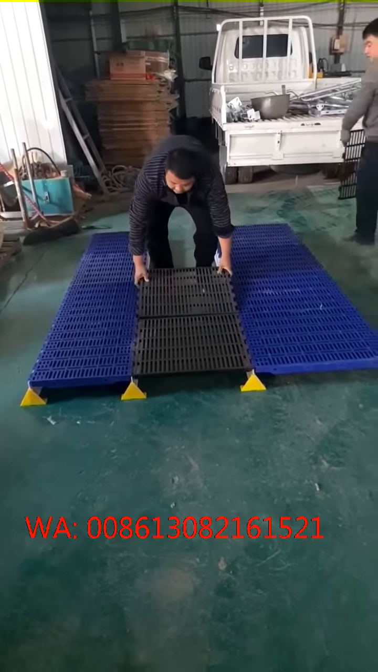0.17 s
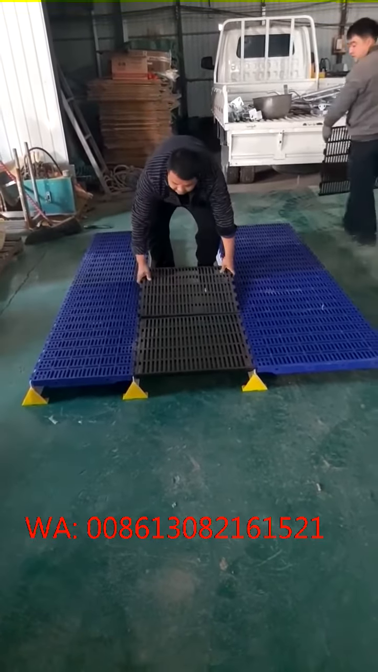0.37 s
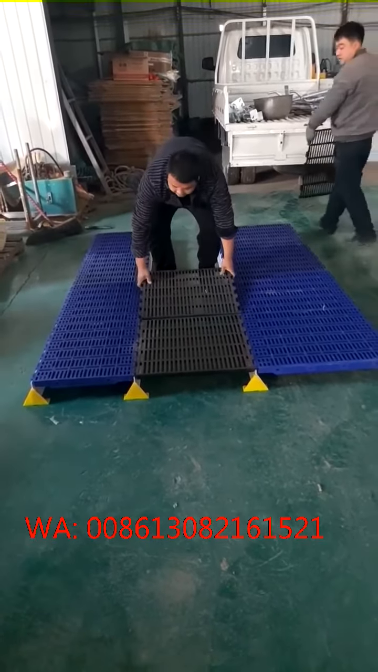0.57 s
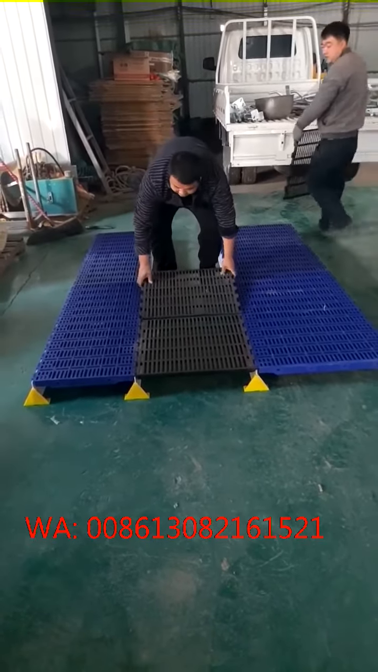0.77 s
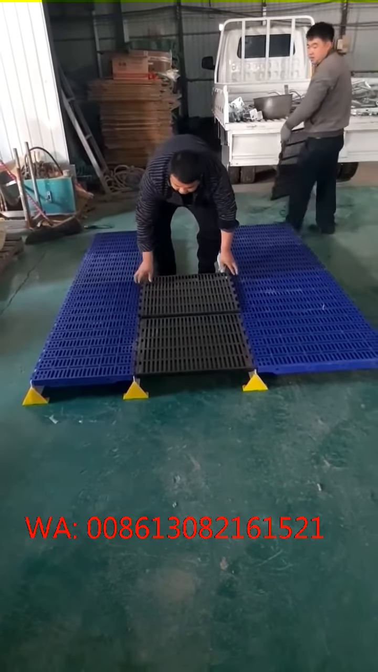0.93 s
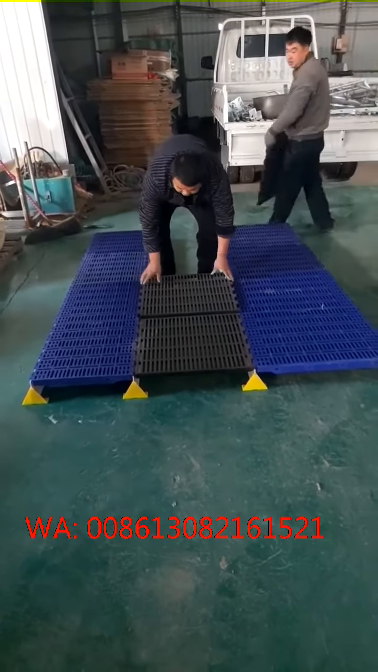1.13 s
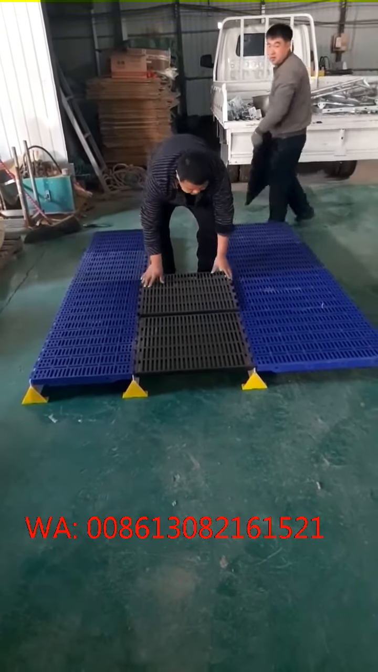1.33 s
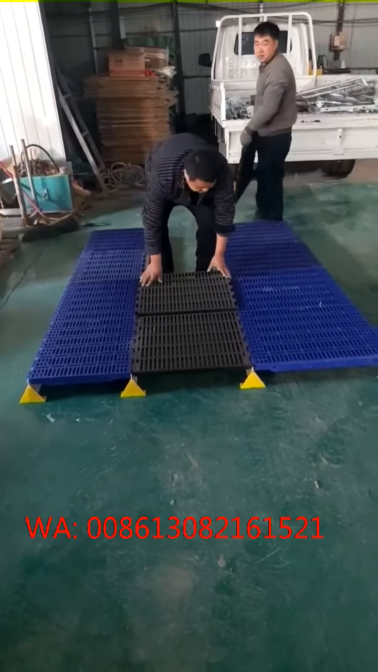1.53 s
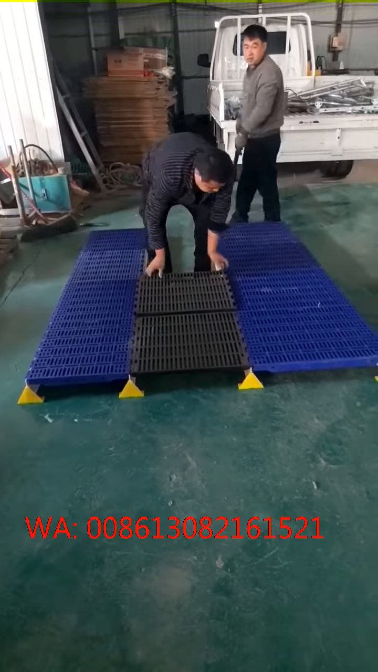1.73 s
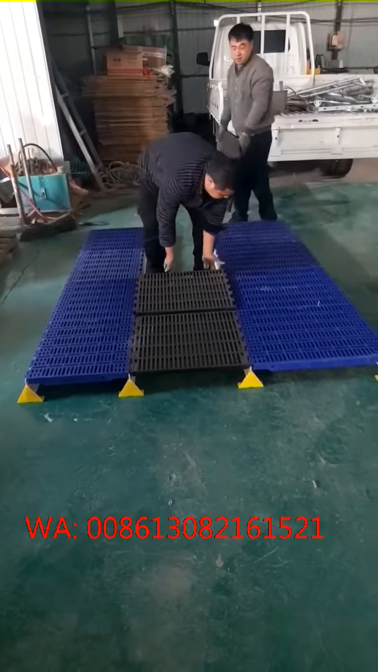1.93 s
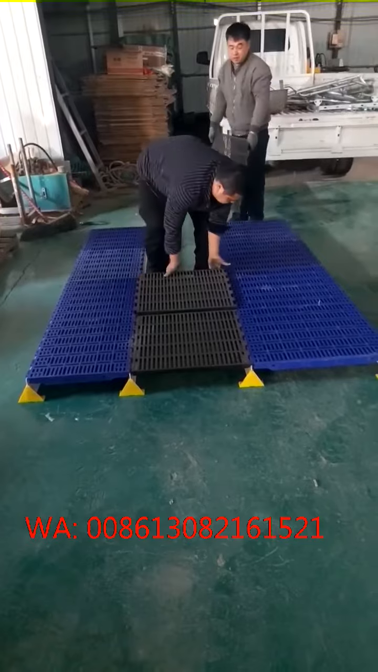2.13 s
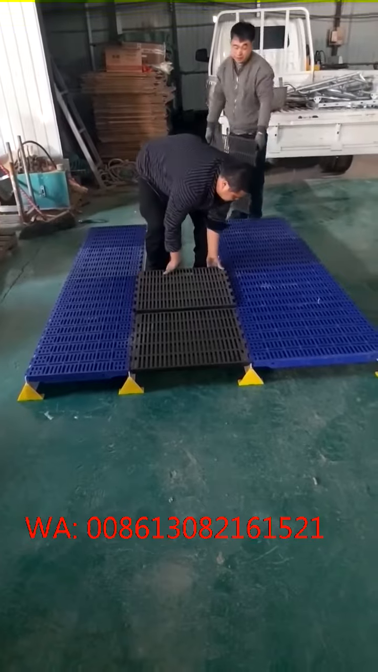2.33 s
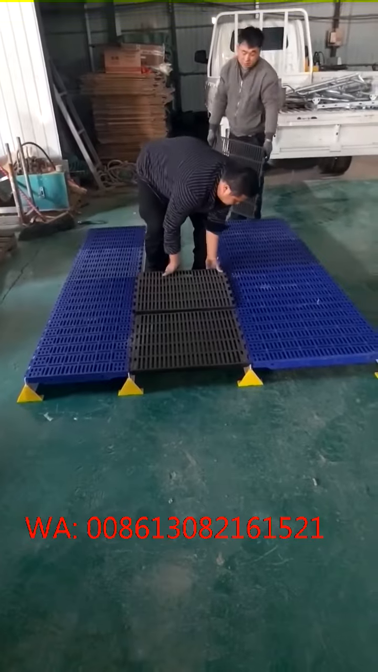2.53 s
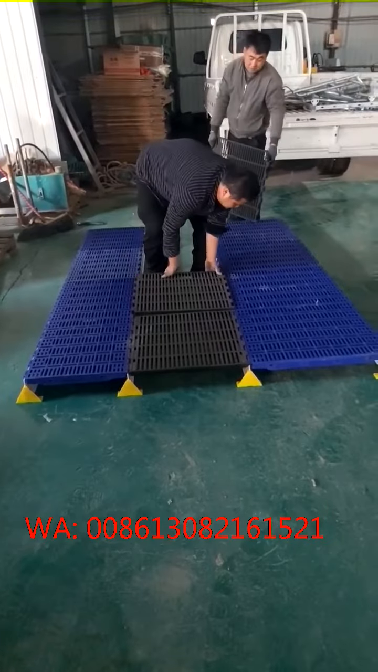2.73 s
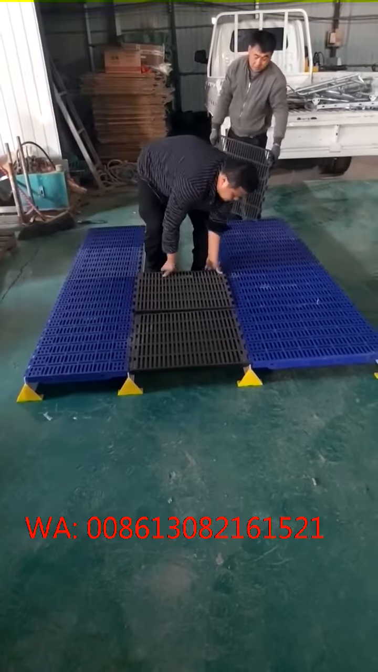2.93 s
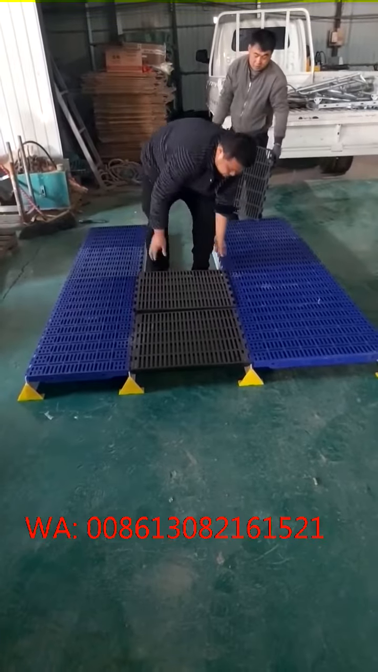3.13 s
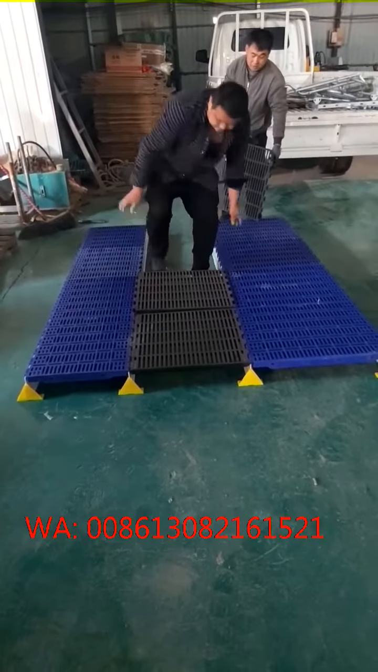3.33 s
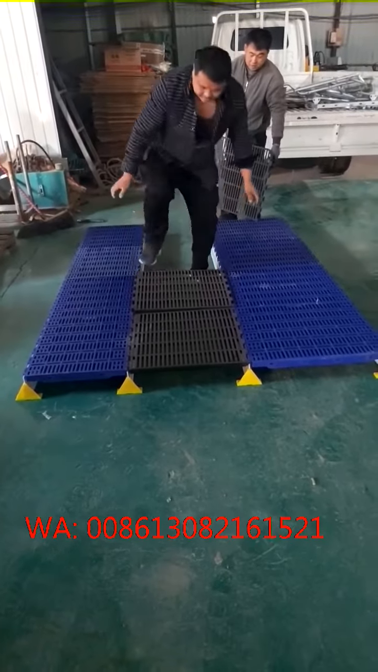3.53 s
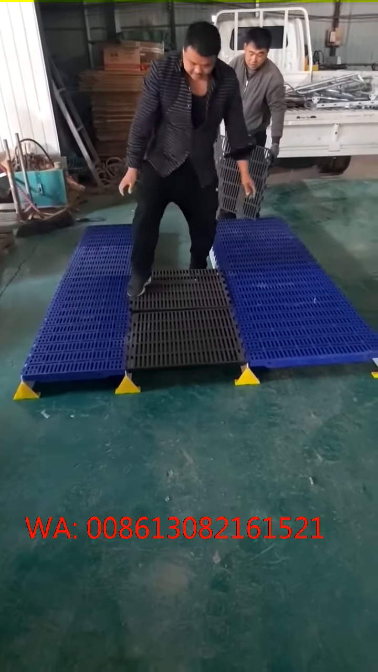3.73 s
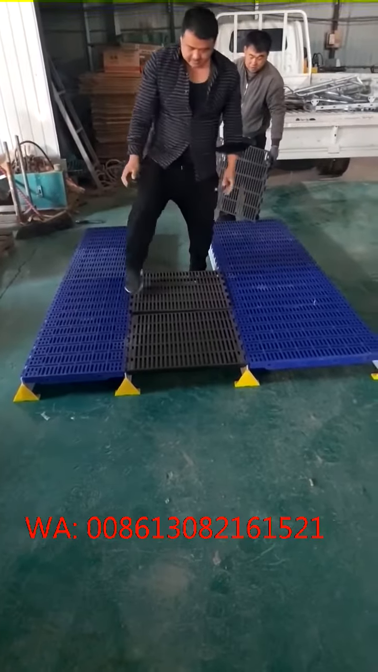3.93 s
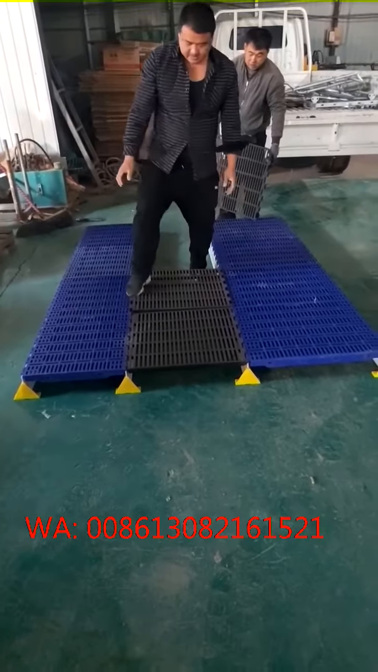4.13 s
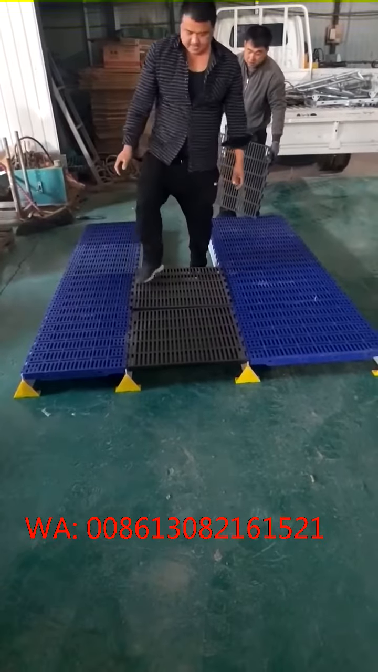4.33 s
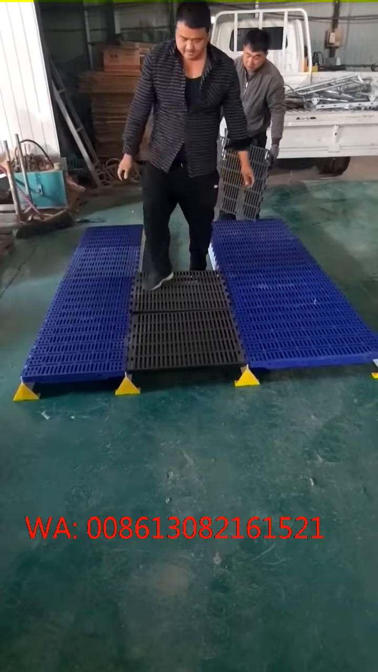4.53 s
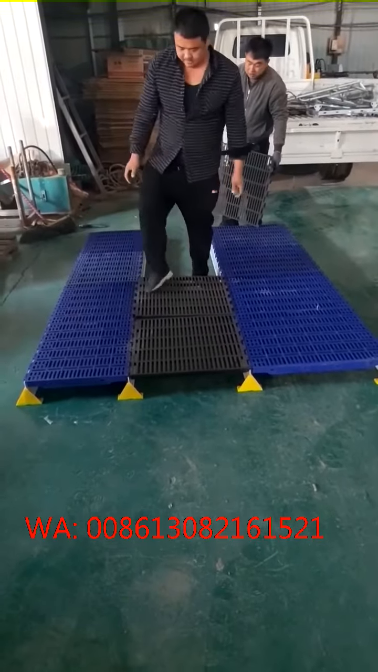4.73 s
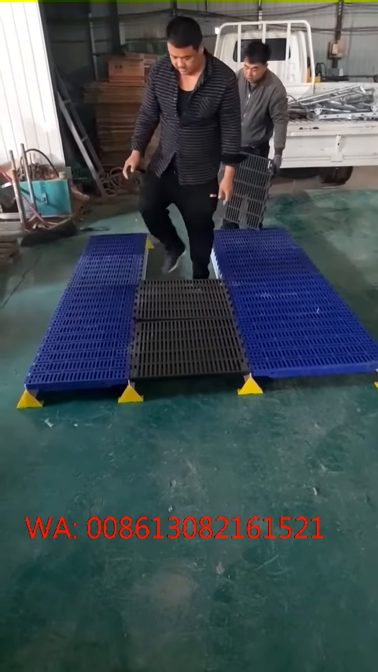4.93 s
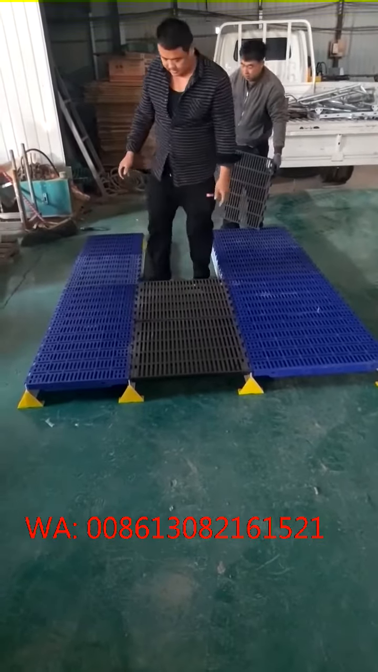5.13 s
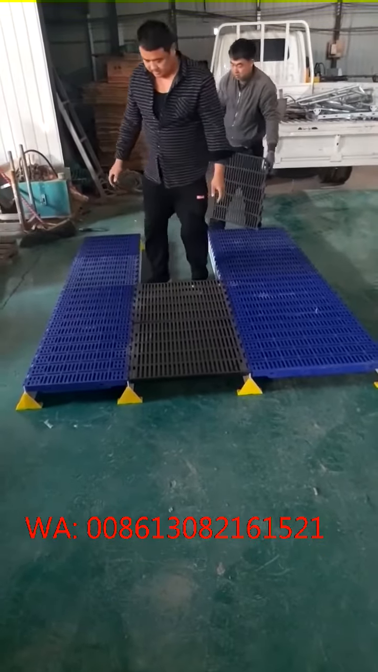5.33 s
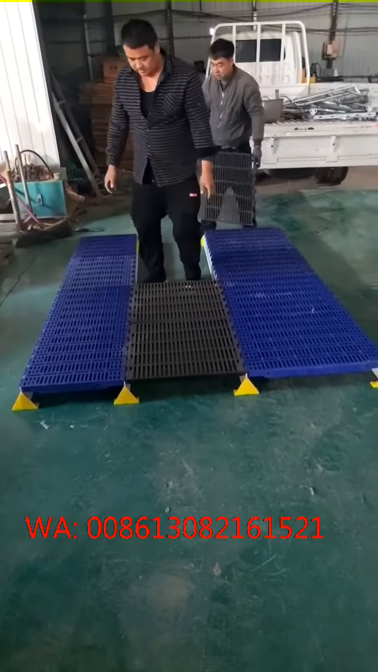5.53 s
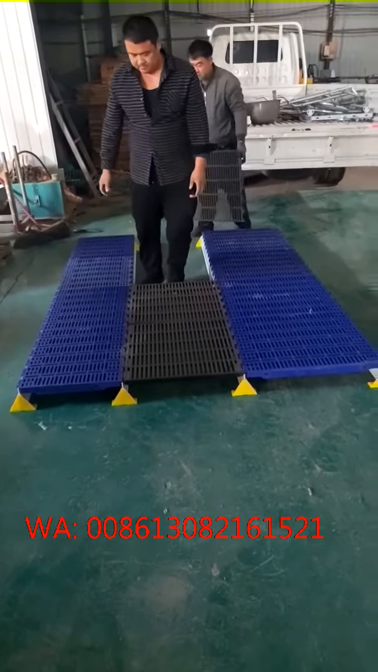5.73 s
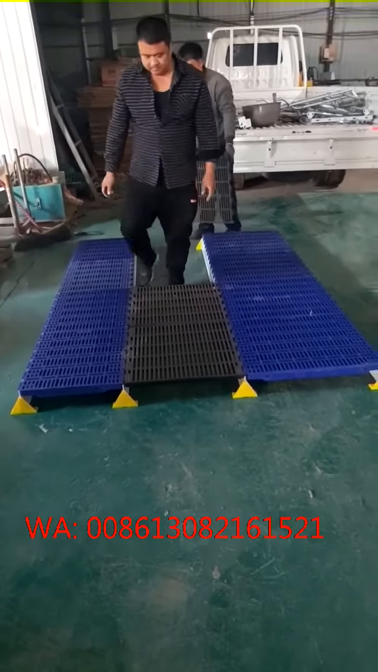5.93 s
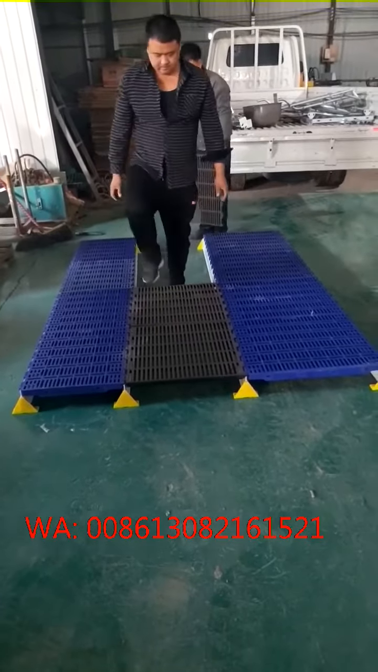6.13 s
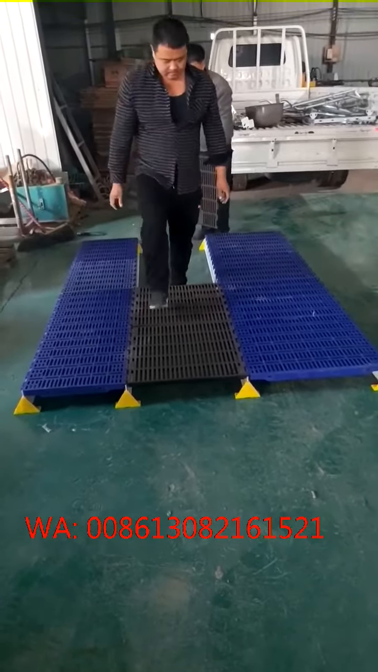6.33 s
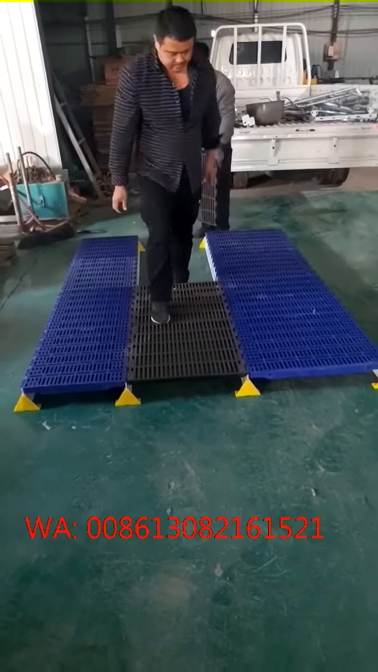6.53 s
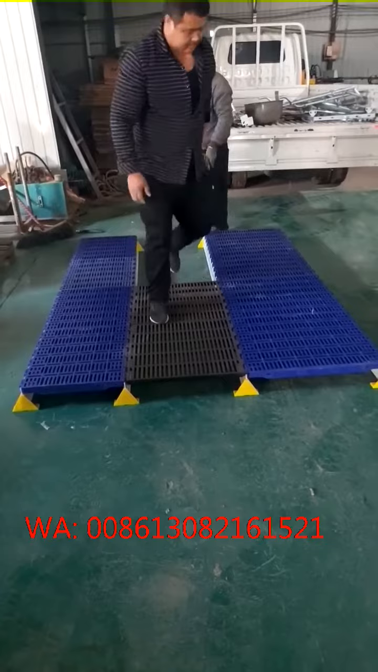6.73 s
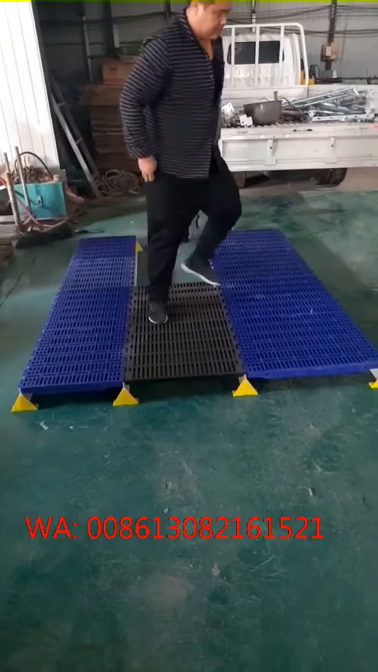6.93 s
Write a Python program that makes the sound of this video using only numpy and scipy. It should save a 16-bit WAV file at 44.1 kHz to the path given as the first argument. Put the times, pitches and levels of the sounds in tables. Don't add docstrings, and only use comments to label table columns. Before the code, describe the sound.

Quiet scuffs and dragging, a plastic panel dropped with a clattering knock, then several booming foot stamps with snapping clips echoing in a hall.

```python
import sys
import numpy as np
from scipy import signal
from scipy.io import wavfile

SR = 44100
rng = np.random.default_rng(int(sys.argv[2]) if len(sys.argv) > 2 else 0)


def field_ratio(decibels):
    return 10 ** (np.asarray(decibels, dtype=float) / 20)


def to_wav(s):
    ch = np.atleast_2d(s).T
    pcm = np.round(np.clip(ch, -1, 1) * 32767)
    wavfile.write(sys.argv[1], SR, pcm.astype(np.int16))


N = 307267
SPOTS = 15


def rms_one(x):
    return x / np.sqrt(np.mean(x ** 2) + 1e-20)


def at_hz(points, hz):
    points = np.array(points)
    return np.interp(np.log(hz), np.log(points[:, 0]), points[:, 1])


def add(track, at, sound):
    i = round(at * SR)
    track[i:i + len(sound)] += sound


def third_octaves(white):
    edges = 22 * 2 ** (np.arange(29) / 3)
    for k, (low, high) in enumerate(zip(edges, edges[1:])):
        band_filter = signal.butter(2, [low, high], "band", fs=SR, output="sos")
        yield np.sqrt(low * high), signal.sosfilt(band_filter, white[k % 2])


def resonate(x, modes):
    out = 0
    for k, (hz, width_hz, level_db) in enumerate(modes):
        r = np.exp(-np.pi * width_hz / SR)
        b = np.array([1, 0, -1]) * (1 - r * r) / 2
        a = [1, -2 * r * np.cos(2 * np.pi * hz / SR), r * r]
        out = out + (-1) ** k * field_ratio(level_db) * signal.lfilter(b, a, x + 1e-18)
    return out


def drift(rate_hz):
    r = np.exp(-80 * np.pi * rate_hz / SR)
    noise = rng.standard_normal(N // 40 + 2002)
    slow = signal.lfilter([1], [1, -2 * r, r * r], noise)[2000:]
    return np.interp(np.arange(N) / 40, np.arange(len(slow)), rms_one(slow))


def bustle():
    # time in #
    # seconds, level in dB.
    rumble_curve = [
        (0.0, -62),
        (0.99, -53),
        (1.45, -62),
        (2.48, -58),
        (3.18, -66),
        (3.59, -65.5),
        (6.96, -64.5),
    ]
    # level in dB of dragging, whine and hiss.
    idle_db = [-64.5, -63, -68.5]
    # start in seconds, length in seconds, whine in dB, weight in dB, grit in dB.
    shuffles = [(-.1, 0.43, -54.5, -1.5, -7), (1.412, 0.16, -65, -15, -1), (1.698, 0.21, -55, -0.5, -7.5),
                (1.956, 0.11, -53.5, -7, -8), (2.378, 0.22, -52, 7, -8), (2.6, 0.11, -52, -14, -10.5),
                (2.773, 0.17, -55.5, -5, -9), (3.067, 0.06, -58.5, -5.5, -17),
                (5.562, 0.049, -77, 12.5, -7), (5.938, .08, -74, -5, 8.5), (6.063, 0.33, -55, 1, -6.5),
                (6.438, 0.086, -64.5, -2, 4), (6.666, 0.08, -69.5, -5, 6.5), (6.87, .15, -67, 10.5, -0.5)]
    swell_s, fade_db_per_s, rumble_below_drag_db = 0.059, 47.5, -5.5
    t = np.arange(N) / SR
    rumble_db = np.interp(t, *np.transpose(rumble_curve))
    power = field_ratio(np.array([rumble_db] + [np.full(N, db) for db in idle_db])) ** 2
    for s, length_s, whine_db, weight_db, grit_db in shuffles:
        swell = np.clip((t - s) / swell_s, 0, 1)
        shape = swell * field_ratio(-fade_db_per_s * np.maximum(t - s - length_s, 0))
        levels_db = whine_db + np.array([weight_db + rumble_below_drag_db, weight_db, 0, grit_db])
        power = power + (field_ratio(levels_db)[:, None] * shape) ** 2
    return np.sqrt(power)


def workshop():
    # pitch in Hz, level in dB per Hz.
    rumble = [(25, -8.5), (40, -12), (60, 4), (90, -3.5), (140, -8.5), (250, -46.5)]
    drag = [(80, -16.5), (150, -5.5), (260, 2.5), (400, -2.5), (650, -4.5), (1000, -12.5), (1500, -58)]
    whine = [(700, -27.5), (1100, -2.5), (1400, -1.5), (1850, 3), (2300, -5.5), (2900, -2.5), (4000, -36.5)]
    hiss = [(2000, -49.5), (3000, -3), (4500, 2), (6500, -2), (8000, -5), (10000, -4.5), (14000, -14)]
    # pitch in Hz, width in Hz, level in dB.
    whine_peaks = [(1770, 71, -16), (1850, 110, 8.5)]
    layers, together = np.zeros((4, N)), drift(3.3)
    for hz, band in third_octaves(rng.standard_normal((2, N))):
        band = band * field_ratio(0.6 * together + 1.4 * drift(9))
        for layer, colour in zip(layers, [rumble, drag, whine, hiss]):
            layer += field_ratio(at_hz([(10, -90), *colour, (20000, -90)], hz)) * band
    layers[2] += resonate(layers[2], whine_peaks)
    return sum(gain * rms_one(layer) for gain, layer in zip(bustle(), layers))


def blows():
    stamps = [
        (.731, -26.5, -16.5, -16, -23.5),
        (3.512, -9.5, -13, -15.5, -18.5),
        (3.9451, -14, -16, -15, -19),
        (4.3475, -14, -15.5, -14.5, -20),
        (4.9687, -18.5, -21, -26, -31),
        (6.260, -17, -12.5, -20, -23.5),
    ]
    # thump, panel, frame and crack in dB against the stamp.
    edge_db = [-17, -9, -2, -5.5]
    # time in seconds, peak in dB, hardness in dB.
    touches = [
        (0.717, -43.5, 9),
        (3.496, -29, -22.5),
        (3.935, -20.5, -16),
        (4.338, -25.5, -7.5),
        (4.953, -29.5, 1.5),
        (6.233, -37, -14),
    ]
    # time in seconds, panel peak in dB, weight in dB, hardness in dB.
    knocks = [(0.335, -44, -3, -8), (0.35, -42.5, 7.5, -9), (0.408, -60.5, 19.5, -24), (0.707, -47, -4, -1),
              (.752, -16.5, -11, -9.5), (.795, -22, 2, -4.5), (2.233, -45.5, 0, -11),
              (2.255, -52.5, 12, -17), (2.396, -45.5, 5, -12), (2.407, -34.5, -18.5, -6.5),
              (2.459, -53.5, 23, 5), (2.529, -44, -3, -25), (2.585, -49.5, 6, 15.5),
              (5.004, -19, -10, -5.5), (5.015, -23.5, -13, -3), (5.028, -32, 8.5, 1),
              (5.587, -48.5, 4.5, -6), (6.253, -19.5, -1, -7.5), (6.285, -21, -13, -10.5),
              (6.33, -24, -13, -9)]
    edge_lead_s, touch_weight_db = 0.003, 1
    frame_feels = 0.27
    rows = [(s, np.array(parts_db)) for s, *parts_db in stamps]
    rows += [(s - edge_lead_s, parts_db + edge_db) for s, parts_db in rows]
    light = [(s, peak_db, touch_weight_db, hard_db) for s, peak_db, hard_db in touches]
    for s, peak_db, weight_db, hard_db in light + list(knocks):
        rows.append((s, peak_db + np.array([weight_db, 0, frame_feels * hard_db, hard_db])))
    return rows


def rattle(length_s):
    t = np.arange(int(0.04 * SR)) / SR
    hits = rng.random(len(t)) < 0.15
    spray = rng.standard_normal(len(t)) * hits * np.exp(-t / length_s)
    spray[0] = 1.0
    return spray


def strike(direct, path, at, peak_db, modes, length_s, soft_hz, reach_db):
    knocks = np.pad(rattle(length_s), (0, 3000))
    one_knock = np.arange(len(knocks)) == 0
    soft = signal.butter(2, soft_hz, fs=SR)
    sound = resonate(signal.lfilter(*soft, knocks), modes)
    colour = resonate(signal.lfilter(*soft, one_knock), modes)
    sound = field_ratio(peak_db) * sound / np.abs(sound).max()
    add(direct, at, sound)
    add(path, at, field_ratio(reach_db) * rms_one(colour) * np.std(sound))


def contacts():
    # pitch in Hz, width in Hz, level in dB.
    thump = [(63, 15, -9), (103, 52.5, -1), (189.6, 217, 1), (292, 246, -1.5)]
    panel = [(356, 140, -5), (515, 6.9, 2), (554.3, 14, 0.5), (824, 228, -6.5)]
    frame = [(860, 810, -11.5), (1255, 112, 0.5), (1500, 76, -4), (1800, 413, -4.5), (2320, 814, -9)]
    crack = [(2823, 720, 10.5), (3930, 4750, 7.5), (5560, 1500, 9.5), (9240, 2900, -14.5)]
    rattle_s = [0.0072, 0.0025, 0.001, 0.0044]
    soft_hz = [500, 1500, 5000, 15000]
    part_reach_db = [-10, -1.5, 0, -0.5]
    # time in seconds, peak in dB.
    rail_rings = [
        (3.515, -17),
        (3.95, -16),
        (4.356, -16),
        (6.27, -19.5),
    ]
    rib_rings = [
        (3.53, -19),
        (3.99, -16),
        (4.38, -24),
        (6.28, -19.5),
    ]
    # time in seconds, peak in dB, pitch in Hz.
    clacks = [(0.7299, -19, 3860), (0.734, -17.5, 2470), (2.419, -44, 2980), (2.584, -47, 3400),
              (3.513, -14.5, 1650), (3.9432, -15, 1860), (3.962, -14, 1620), (3.138, -41, 6170),
              (4.365, -13, 1800), (4.377, -25.5, 1850), (4.968, -31.5, 5100), (4.971, -19.5, 2380),
              (6.266, -36, 3400)]
    # time in seconds, peak in dB, pitch in Hz.
    ticks = [
        (2.232, -47, 8100),
        (2.587, -36.5, 9800),
        (2.63, -46, 7630),
        (2.889, -41.5, 5030),
        (3.12, -36.5, 6900),
        (3.9345, -35, 9900),
        (6.749, -46, 6470),
    ]
    ring_reach_db, clack_reach_db = 2, -5
    direct, spread = np.zeros(N), np.zeros((SPOTS, N))
    for k, (s, parts_db) in enumerate(blows()):
        for part, modes in enumerate([thump, panel, frame, crack]):
            path = spread[(4 * k + part) % 12]
            strike(direct, path, s, parts_db[part], modes, rattle_s[part], soft_hz[part], part_reach_db[part])
    # time, peak dB, pitch Hz, width Hz, reach dB; clacks and ticks widen with their pitch
    singles = [(s, db, 1361, 104, ring_reach_db) for s, db in rail_rings]
    singles += [(s, db, 508.6, 44, ring_reach_db) for s, db in rib_rings]
    singles += [(s, db, hz, 0.16 * hz, clack_reach_db) for s, db, hz in clacks]
    singles += [(s, db, hz, 0.56 * hz, clack_reach_db) for s, db, hz in ticks]
    for k, (s, peak_db, hz, width_hz, reach_db) in enumerate(singles):
        path = spread[12 + k % 3]
        strike(direct, path, s, peak_db, [(hz, width_hz, 0)], 0.0026, soft_hz[-1], reach_db)
    return direct, spread


def hall(direct, spread):
    # pitch in Hz, time in seconds.
    hall_t60 = [(50, 1.12), (120, 0.66), (250, 1.4), (500, 1.155), (1300, 1.49), (2500, 1.293), (5000, 0.8),
                (8000, 0.67)]
    # pitch in Hz, level in dB.
    hall_db = [(50, 5.5), (150, -6.5), (300, -4), (520, -4.5), (1300, -3.5), (3000, -1), (8000, 1),
               (14000, -1)]
    # delay in seconds, level in dB.
    echoes = [(0.0171, -9), (0.042, -7.5)]
    wet_db, build_s = 5, 0.0073
    t = np.arange(int(1.6 * SR)) / SR
    out = direct.copy()
    for lag_s, level_db in echoes:
        out += field_ratio(level_db) * np.roll(direct, round(lag_s * SR))
    for source in spread:
        tail = np.zeros(len(t))
        for hz, band in third_octaves(rng.standard_normal((2, len(t)))):
            tail += field_ratio(at_hz(hall_db, hz) - 60 * t / at_hz(hall_t60, hz)) * band
        tail = tail * (1 - np.exp(-t / build_s)) * (1 + 0.91 * np.exp(-t / 0.023))
        out += field_ratio(wet_db) * signal.fftconvolve(source, tail / np.sqrt(np.sum(tail ** 2)))[:N]
    return out


def scene():
    return (hall(*contacts()) + workshop())[None]


def thin_treble(x):
    # pitch in Hz, level in dB against the whole sound.
    survives = [(6000, -64), (7500, -52), (8300, -39.5), (8900, -30.5), (10000, -27.5), (14000, -34)]
    follow, ragged_db = 0.78, 3.5
    left_db, fleck_db, fleck_share = -50, -16, 0.15
    smear_db, smear_hz = -17, 2200
    window = np.sin(np.pi * (np.arange(2048) + 0.5) / 2048)
    hz, _, frames = signal.stft(x, SR, window, nperseg=2048, noverlap=1024)
    power = np.abs(frames[:1024]) ** 2 * 1.6 + 1e-16
    whole = power.sum(axis=0)
    slices_db = 10 * np.log10(power.reshape(64, 16, -1).sum(axis=1))
    limit_db = at_hz([(10, -150), *survives], hz[8:1024:16])[:, None]
    need_db = limit_db + follow * 10 * np.log10(whole)
    kept = slices_db + ragged_db * rng.standard_normal(slices_db.shape) > need_db
    flecks = (whole < field_ratio(2 * -48)) & (rng.random(slices_db.shape) < fleck_share)
    dropped = np.where(flecks, field_ratio(fleck_db), field_ratio(left_db))
    frames[:1024] *= np.repeat(np.where(kept, 1, dropped), 16, axis=0)
    grain = rng.standard_normal(frames.shape) + 1j * rng.standard_normal(frames.shape)
    frames *= 1 + field_ratio(smear_db) * np.clip(hz / smear_hz - 1, 0, 1)[:, None] * grain
    return signal.istft(frames, SR, window, nperseg=2048, noverlap=1024)[1][:N]


def roll_off(x):
    return signal.sosfilt(signal.butter(12, 14060, fs=SR, output="sos"), x)


def record(dry):
    mix = thin_treble(dry[0])[None]
    return roll_off(mix)


dry = scene()
out = record(dry)
to_wav(out)
```